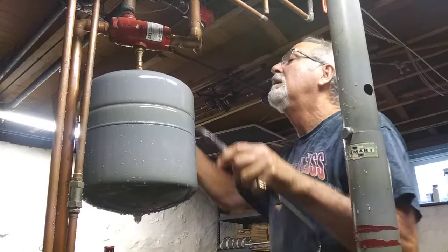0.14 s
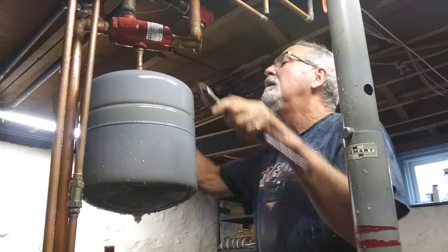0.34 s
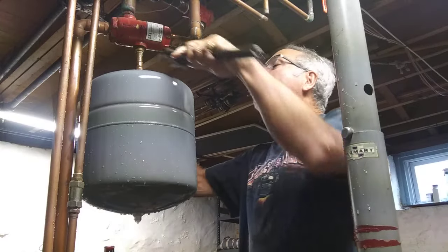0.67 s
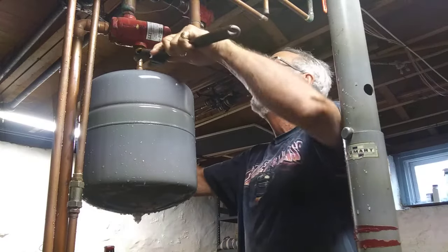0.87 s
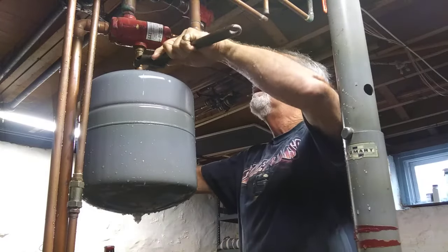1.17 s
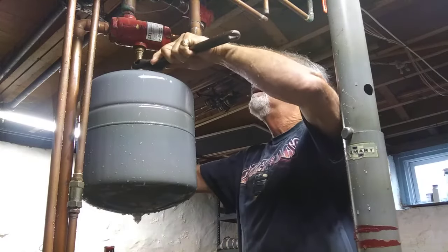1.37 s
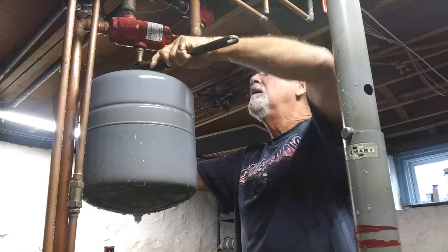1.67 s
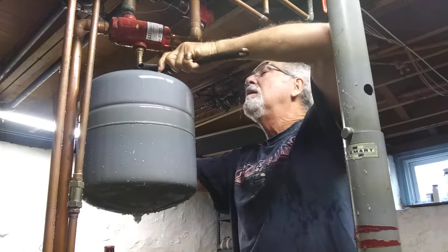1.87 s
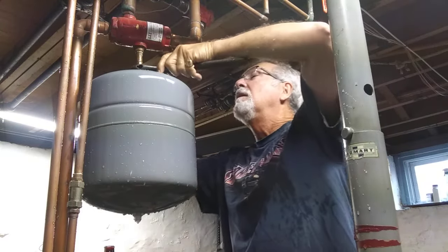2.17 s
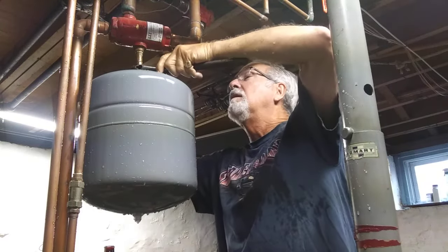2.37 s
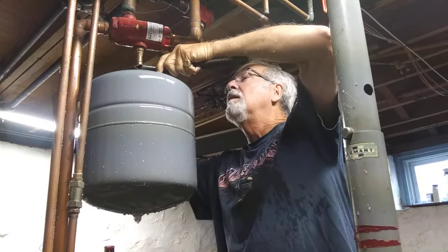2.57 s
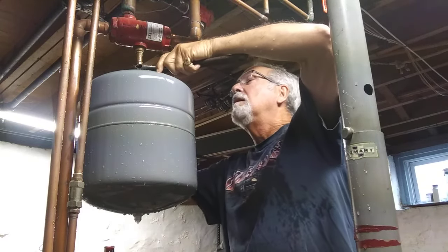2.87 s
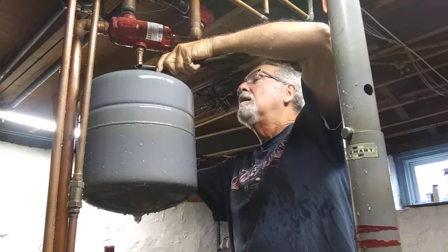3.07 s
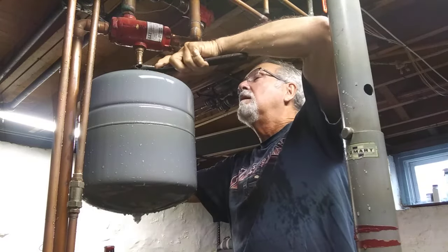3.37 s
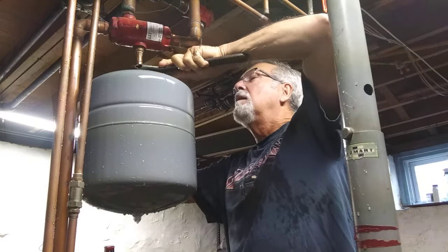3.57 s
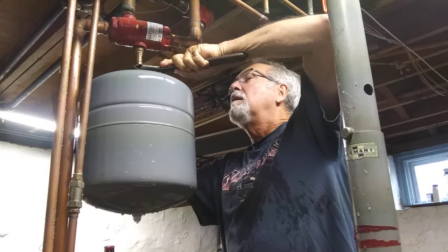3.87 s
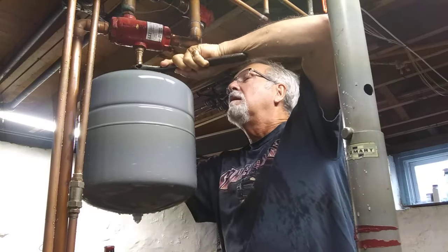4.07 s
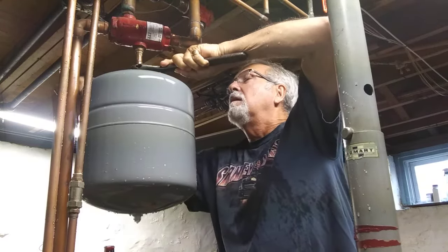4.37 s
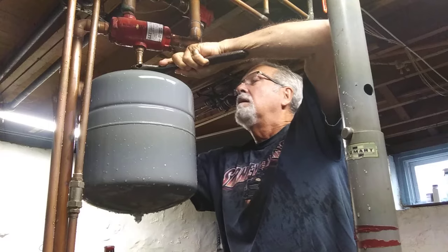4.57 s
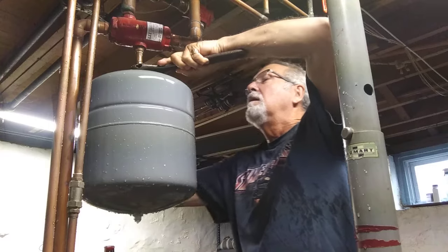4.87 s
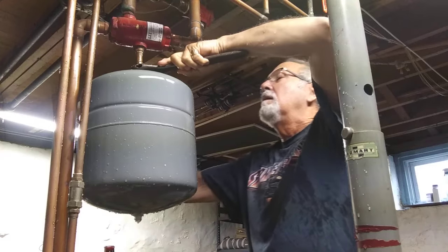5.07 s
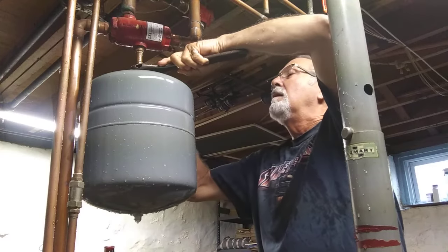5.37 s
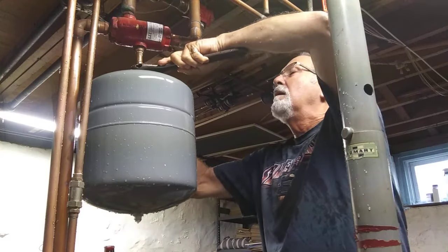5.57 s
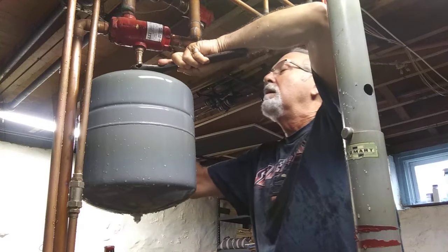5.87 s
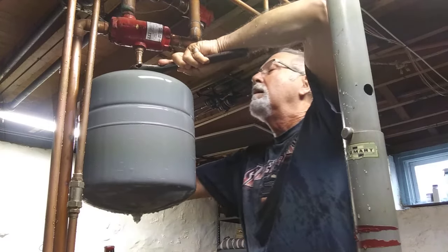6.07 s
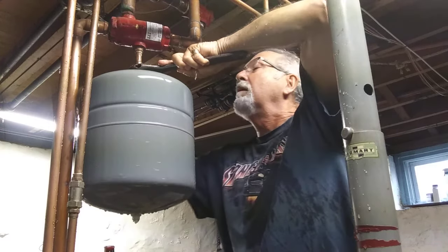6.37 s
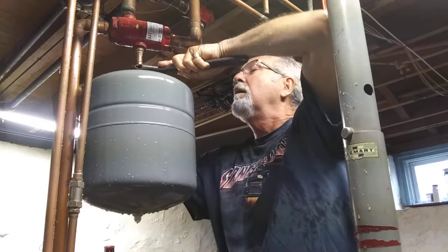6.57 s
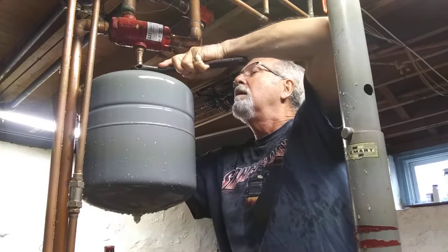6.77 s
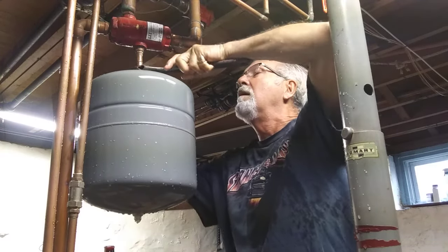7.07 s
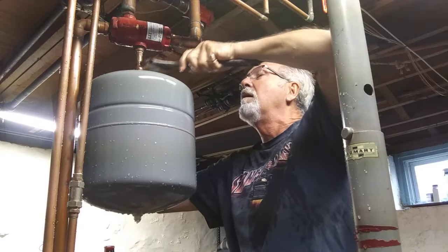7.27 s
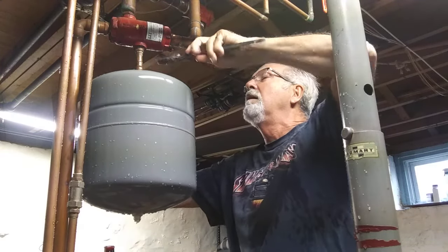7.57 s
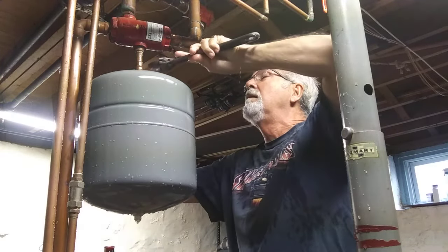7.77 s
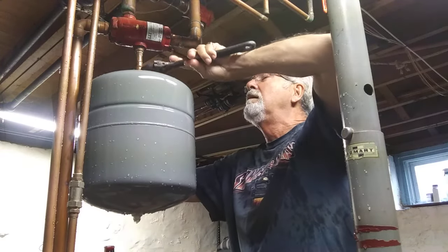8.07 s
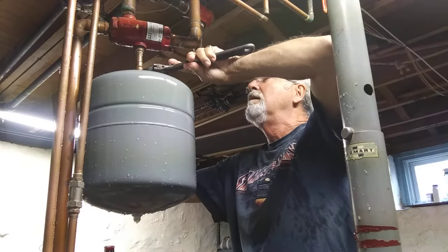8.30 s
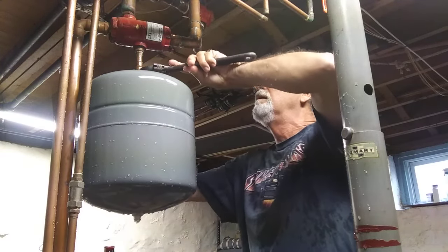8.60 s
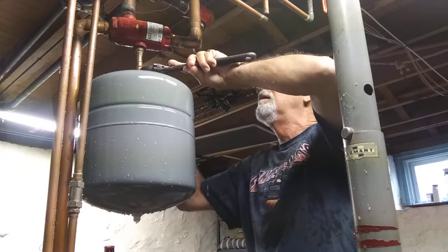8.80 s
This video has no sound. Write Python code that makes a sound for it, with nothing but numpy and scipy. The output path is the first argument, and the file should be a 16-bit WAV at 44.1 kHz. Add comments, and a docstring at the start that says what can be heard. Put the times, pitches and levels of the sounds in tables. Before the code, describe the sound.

Irregular ringing clicks and brief scrapes of a wrench turning a brass fitting, with dull knocks from a steel tank.

```python
"""An adjustable wrench clacks and rings on a threaded brass fitting above a steel expansion tank.
Its loose jaw clacks as it is set and lifted, the handle rings when it bites, and pipe and tank
knock along. Between blows, steel scrapes on brass in showers of tiny slips and gives thin squeaks.
The basement's low ceiling answers with close echoes, over a faint hiss."""
import sys
import numpy as np
from scipy import signal
from scipy.fft import rfft, irfft
from scipy.io import wavfile
from scipy.ndimage import uniform_filter1d

SR = 44100
rng = np.random.default_rng(int(sys.argv[2]) if len(sys.argv) > 2 else 0)


def dump(signal):
    """Clip the signal to [-1, 1] and save it as 16-bit WAV at the path in sys.argv[1]."""
    limited = np.clip(np.atleast_2d(signal).T, -1, 1)
    pcm = np.round(limited * 32767).astype(np.int16)
    wavfile.write(sys.argv[1], SR, pcm)


N = 394254
LENGTH = 32768  # samples set aside for one short sound
T = np.arange(LENGTH) / SR  # its time axis in seconds
HZ = np.fft.rfftfreq(LENGTH, 1 / SR)  # its frequency axis

# Blows of the wrench. Each row: start in seconds, ring level in dB, tank knock level in dB,
# hardness of the contact and brightness of the knock, both as a treble lift in dB per octave.
WRENCH_BLOWS = [ (.495, -34, -47.5, 0, 4.5), (.644, -38.5, -52, 0, 0.5), (0.828, -49, -66, 16, 6),
                (1.222, -30.5, -39.5, -8, 0.5), (1.335, -27.5, -36.5, 1, 1.5),
                (1.569, -58.5, -62.5, 15.5, 15), (1.792, -64.5, -65, -12, -2), (1.998, -56, -46.5, 1, 9.5),
                (2.082, -58, -63, 11, -3), (2.193, -41, -35, -9, -1), (2.602, -67, -54.5, 2, 0),
                (3.047, -42.5, -49, 4.5, -3), (3.177, -43, -45.5, 8.5, 0.5), (4.236, -55.5, -63, 8, -1),
                (4.492, -47.5, -57, 2, -3.5), (4.547, -40.5, -48, 3, -0.5), (4.589, -44.5, -60, 16.5, 5),
                (4.675, -18.5, -39, -2.5, -2), (4.796, -22.5, -28.5, 1.5, 3.5), (5.045, -54.5, -54, -7, -5),
                (5.135, -55, -58, -3, -3), (5.182, -54, -50, 0.5, -3), (5.435, -43.5, -50, 4, -6),
                (5.526, -51, -51, 6, 0.5), (5.794, -69, -58, -11.5, -1), (6.473, -49, -43.5, 2.5, 3),
                (6.603, -61, -57.5, 10, -1), (6.795, -43.5, -52, 1.5, -2), (6.895, -50, -61.5, -0.5, 2),
                (6.933, -52.5, -59, -3.5, 0), (7.104, -53.5, -56, -2, -3), (7.677, -47, -52.5, 9, -1),
                (7.887, -34.5, -35.5, 2.5, 0.5), (7.954, -45, -42.5, -14, -5.5),
                (8.153, -47, -47.5, -4.5, -4), (8.214, -56.5, -54.5, 6.5, -3.5),
                (8.377, -49, -40.5, 2, 0.5), (8.490, -62.5, -50.5, 3, 1), (8.557, -53, -48, 1, -0.5),
                (8.621, -40.5, -52, 2, 4.5), (8.784, -46.5, -46, -11, 2.5), (8.811, -53, -39.5, 14, 0),
                (8.903, -32.5, -31.5, 5.5, -6.5)]
# How firmly the wrench sits. Each row: time in seconds, grip from 0 (loose) to 2 (seated).
WRENCH_GRIP = [(.65, 0.22), (1.22, 1.33), (2, 0.48), (2.19, 1.6), (2.6, 0.49), (3.18, 0.32), (4.24, 0.82),
               (4.67, 0.17), (4.8, 0.63), (6.7, 0.22), (7.68, 0.43), (7.89, 1.19), (8.5, 0.34)]


def wrench_blows():
    """Each blow rings the wrench, knocks the tank and ticks where the metals meet."""
    out = np.zeros(N)
    for start, ring_db, knock_db, hardness, brightness in WRENCH_BLOWS:
        grip = np.interp(start, *np.transpose(WRENCH_GRIP))
        # Heavy blows set the pipework shivering; lighter ones leave less of a tail.
        tail_db = min(FULL_TAIL_DB, 20 + 0.27 * max(ring_db, knock_db))
        hit = basement(tail_db)
        metal = tilted(wrench_ring(hit, grip), hardness, low_hz=1800, high_hz=6400)
        knock = tilted(tank_knock(hit, grip), brightness, low_hz=190, high_hz=2600)
        # The tick grows with the blow and its hardness; a tight grip muffles it.
        tick_db = ring_db - 21.5 + 0.78 * hardness - 2 * grip
        for sound, db in (metal, ring_db), (knock, knock_db), (contact_tick(hit), tick_db):
            add(out, start, at_level(sound, db))
    return out


# The tones of the loose jaw in its slide, the tightly held handle and the brass fitting.
# Each row: pitch in Hz, energy in dB, ring time in seconds (the time to fade by 60 dB).
JAW_TONES = [(2013, 4, 0.025), (2194, 3, 0.014), (2733, -2.5, 0.045), (3580, -5, 0.036),
             (4224, -15.5, 0.018), (4750, -10.5, 0.042)]
HANDLE_TONES = [(2425, -2.5, 0.024), (2563, -1.5, 0.027), (2940, -9.5, 0.035), (3417, -4.5, 0.045),
                (3746, -8, 0.048), (4410, -9.5, 0.034)]
FITTING_TONES = [(2482, -4, 0.034), (3340, 3.5, 0.079), (5150, -22.5, .1)]
# The quickly dying clack of the steel. Each row: frequency in Hz, level in dB.
CLACK_SPECTRUM = [(400, -48), (1400, -7.5), (2100, 4), (3000, 6), (4700, 4), (6000, -4.5), (7500, -17),
                  (16000, -40.5)]


def wrench_ring(drive, grip):
    """As the grip tightens, the ring passes from jaw to handle to fitting and the clack softens."""
    shares = np.maximum(1 - abs(np.clip(grip, 0, 2) - np.arange(3)), 0)
    parts = JAW_TONES, HANDLE_TONES, FITTING_TONES
    tones = sum(share * ring(drive, part) for share, part in zip(shares, parts) if share > 0)
    clack = shaped(drive, CLACK_SPECTRUM)
    return unit(tones) + gain_of(-3 - 4 * grip) * unit(clack)


# The tones of tank and pipework. Each row: pitch in Hz, energy in dB, ring time in seconds.
TANK_TONES = [(188, -14, 0.39), (293.2, -4.5, 0.097), (449.3, -3, 0.22), (633.3, 2.5, 0.085),
              (788, 1, 0.033), (753, -17.5, 1.5), (1074, -9, 0.17)]
# Their quickly dying thud. Each row: frequency in Hz, level in dB.
THUD_SPECTRUM = [(85, -32.5), (130, -12), (200, 7), (400, 7.5), (800, -1), (1300, 0), (2000, -11),
                 (5000, -67.5)]


def tank_knock(drive, grip):
    """A firm grip rings the tank; a loose one mostly thuds."""
    thud = shaped(drive, THUD_SPECTRUM)
    return ring(drive, TANK_TONES) + gain_of(7 - 9 * grip) * unit(thud)


# The bright tick of metal on metal. Each row: frequency in Hz, level in dB.
TICK_SPECTRUM = [(2500, -28.5), (5500, -4.5), (7600, 1.5), (10000, 4.5), (13000, -5.5), (16000, -5)]


def contact_tick(drive):
    """Where the metals meet, each touch gives a short burst of treble."""
    return shaped(drive, TICK_SPECTRUM)


# The tones of the free wrench. Each row: pitch in Hz, energy in dB, ring time in seconds.
FREE_WRENCH_TONES = [(767, 8.5, 0.12), (1710, 6, 0.038), (3270, 7, 0.015), (6300, -6, 0.065)]


def wrench_ping(start_s=0.829, level_db=-48.5):
    """The wrench rings freely in the hand, once."""
    out = np.zeros(N)
    add(out, start_s, at_level(ring(basement(), FREE_WRENCH_TONES), level_db))
    return out


# The high overtones of the steel. Each row: pitch in Hz, energy in dB, ring time in seconds.
STEEL_OVERTONES = [(4420, 5.5, .03), (5230, 2.5, .05), (6266, -1.5, .04), (7200, 0, 0.084),
                   (8820, -4, 0.035)]
# Glancing blows. Each row: start in seconds, level in dB, the pitch it catches best in Hz.
GLANCING_BLOWS = [(1.224, -39, 3900), (1.336, -34, 4100), (4.588, -49, 5700), (4.674, -34, 6380),
                  (4.797, -37, 7350), (7.676, -46.5, 4160)]


def glancing_blows(falloff_db_per_octave=45):
    """A glancing blow rings the overtones near one pitch; the higher that is, the more it cracks."""
    out = np.zeros(N)
    for start, level_db, best_hz in GLANCING_BLOWS:
        hit = basement(tail_db=1)
        tones = [(hz, db - falloff_db_per_octave * abs(np.log2(hz / best_hz)), ring_s)
                 for hz, db, ring_s in STEEL_OVERTONES]
        octaves_away = np.log2(np.maximum(HZ / best_hz, 1 / 4))
        crack = unit(through(hit, click(-13 * octaves_away ** 2)))
        crack_gain = gain_of(1 + 28 * np.log2(best_hz / 6000))
        add(out, start, at_level(ring(hit, tones) + crack_gain * crack, level_db))
    return out


# Strokes of steel sliding on brass. Each row: time of the peak in seconds, rise time in seconds,
# rasp level in dB, tank rumble level in dB.
SCRAPE_STROKES = [ (0.018, 0.054, -58, -83), (.19, 0.035, -62.5, -73), (0.405, 0.029, -39, -50.5),
                  (1.9, 0.2, -68.5, -61.5), (2.209, .012, -47, -41.5), (2.335, .01, -54.5, -52),
                  (2.367, 0.013, -49, -53.5), (2.405, 0.011, -57, -74), (2.451, 0.0082, -55.5, -59),
                  (2.675, 0.041, -59, -64.5), (2.776, 0.022, -48, -56.5), (3.28, 0.068, -60, -79),
                  (3.479, 0.011, -61, -68), (3.94, 0.19, -64.5, -80), (4.264, 0.022, -55.5, -57),
                  (4.525, 0.023, -55.5, -47.5), (5.449, 0.01, -47.5, -49), (6.15, 0.054, -68, -62),
                  (6.84, 0.018, -56, -55.5), (7.14, 0.12, -61, -56), (8.04, 0.08, -58, -51),
                  (8.171, 0.0095, -55.5, -59), (8.812, 0.052, -48, -44.5)]


def scrapes(slips_per_s=1800, spread_db=6, fizz_db=-13):
    """Showers of tiny slips swell and fade with each stroke; under load they make the metal ring."""
    out = np.zeros(N)
    for peak_s, rise_s, rasp_db, rumble_db in SCRAPE_STROKES:
        pressure = np.exp(-2 * (T / rise_s - 2) ** 2) * catching(depth_db=5)
        sizes = gain_of(spread_db * np.minimum(rng.exponential(1, LENGTH), 4))
        signs = rng.choice([-1, 1], LENGTH)
        slipping = rng.random(LENGTH) < slips_per_s / SR
        slips = through(pressure * sizes * signs * slipping, basement())
        load = np.clip(0.5 + (rumble_db - rasp_db) / 6, 0, 2)  # a loaded stroke shakes the tank more
        rasp = unit(shaped(slips, CLACK_SPECTRUM)) + load * wrench_ring(slips, load)
        rumble = tilted(tank_knock(slips, load), db_per_octave=2, low_hz=170, high_hz=2200)
        fizz = contact_tick(slips)
        for sound, db in (rasp, rasp_db), (rumble, rumble_db), (fizz, rasp_db + fizz_db):
            add(out, peak_s - 2 * rise_s, at_level(sound, db))
    return out


def catching(depth_db, step=256):
    """A gain that jumps about every few milliseconds as steel catches and lets go."""
    jumps = rng.standard_normal(LENGTH // step)
    return gain_of(depth_db * np.interp(T, T[::step], jumps))


# Squeaks and groans of the sliding jaw and thread. Each row: time of the peak in seconds,
# half the length in seconds, pitch in Hz, level in dB.
THIN_SQUEAKS = [(1.82, 0.12, 1660, -68), (2.09, .11, 3370, -68.5), (2.17, .05, 4460, -65),
                (4.275, .028, 877, -55), (4.28, .035, 312, -60), (6.15, .06, 900, -71),
                (7.161, .08, 4430, -65), (8.75, .03, 2060, -56)]


def squeaks(ring_s=0.084):
    """Light, uneven friction keeps one tone singing for a moment."""
    out = np.zeros(N)
    for peak_s, half_s, hz, db in THIN_SQUEAKS:
        rub = rng.standard_normal(LENGTH) * np.exp(-(T / half_s - 2) ** 2)
        squeak = resonate(rub, hz, ring_s) * catching(depth_db=4)
        add(out, peak_s - 2 * half_s, at_level(squeak, db))
    return out


def settling_ticks(count=22, loudest_db=-62, range_db=7, soonest_s=0.046, settle_s=0.62):
    """Faint stray ticks as the wrench settles after a blow."""
    out = np.zeros(N)
    for which, wait, softness, grip in rng.random((count, 4)):
        touch = basement(tail_db=1)
        sound = unit(wrench_ring(touch, grip)) + unit(tank_knock(touch, grip))
        blow_s = WRENCH_BLOWS[int(which * len(WRENCH_BLOWS))][0]
        add(out, blow_s + soonest_s + wait * settle_s, at_level(sound, loudest_db - range_db * softness))
    return out


FULL_TAIL_DB = 8  # level of the fullest echo tail
# How long the basement rings. Each row: frequency in Hz, seconds to fade by 60 dB.
ROOM_RING_TIMES = [(150, 0.63), (400, 0.31), (1000, 0.26), (15000, 0.27)]
# Close echoes off the ceiling and the tank. Each row: delay in seconds, gain.
CLOSE_ECHOES = [(.0021, 0.49), (.0055, 0.793), (.0072, 0.83)]


def basement(tail_db=FULL_TAIL_DB, scatter_db=-1, scatter_s=0.011, build_s=0.0029):
    """One tap with its echoes, scatter off the pipes and tail, new for each position of the wrench."""
    hz, t, bands = signal.stft(rng.standard_normal(LENGTH), SR, nperseg=256)
    fade = gain_of(-60 * t / curve_at(ROOM_RING_TIMES, hz)[:, None])
    tail = signal.istft(bands * fade, SR, nperseg=256)[1][:LENGTH]
    tail *= 1 - np.exp(-T / build_s)
    scatter = rng.standard_normal(LENGTH) * np.exp(-T / scatter_s)
    response = gain_of(tail_db) * (unit(tail) + gain_of(scatter_db) * unit(scatter))
    response[0] += 0.86  # the sound that comes straight to the ear
    for delay_s, gain in CLOSE_ECHOES:
        add(response, delay_s * rng.uniform(0.9, 1.1), np.array([gain]))
    return response


# The colour of the background hiss. Each row: frequency in Hz, relative level in dB.
HISS_SPECTRUM = [(30, -53), (140, -18.5), (230, -6), (420, -3.5), (480, -7), (728, -5.5), (852, -10),
                 (1640, -11.5), (4310, -17), (5890, -28), (15500, -22)]


def hiss(level_db=-65):
    """Still room air and steady microphone hiss."""
    colour = gain_of(curve_at(HISS_SPECTRUM, np.fft.rfftfreq(N, 1 / SR)))
    air = irfft(rfft(rng.standard_normal(N)) * colour, N)
    return unit(air) * np.sqrt(N) * gain_of(level_db)


def ring(drive, tones, detune=0.0084):
    """A metal part's tones, shifted slightly by the hold; neighbours swing in opposite directions."""
    shifts = 1 + detune * rng.uniform(-1.4, 1, len(tones))
    return unit(sum((-1) ** k * gain_of(db) * resonate(drive, hz * shifts[k], ring_s)
                    for k, (hz, db, ring_s) in enumerate(tones)))


def resonate(drive, hz, ring_s):
    """One tone shaken by the drive (a tap or a rub), fading by 60 dB in ring_s seconds."""
    radius = np.exp(-np.log(1000) / (ring_s * SR))
    feedback = [1, -2 * radius * np.cos(2 * np.pi * hz / SR), radius ** 2]
    return unit(signal.lfilter([1, 0, -1], feedback, drive))


def tilted(x, db_per_octave, low_hz, high_hz):
    """Leans the sound between two frequencies: brighter for a hard contact, duller for a soft one."""
    slope = db_per_octave * np.log2(np.clip(HZ, low_hz, high_hz))
    return through(x, click(slope)[:LENGTH // 16])


def shaped(x, spectrum):
    """Colours a sound with a table of frequencies and levels."""
    return through(x, click(curve_at(spectrum, HZ)))


def click(db):
    """The shortest pulse that starts at once and has this spectrum."""
    log_gain = np.log(gain_of(np.r_[db, db[-2:0:-1]]))
    spectrum = np.exp(np.conj(signal.hilbert(log_gain)))
    return unit(np.fft.ifft(spectrum).real)


def through(x, response):
    """Passes a sound through a response (convolution), keeping its length."""
    return signal.fftconvolve(x, response)[:len(x)]


def curve_at(points, hz):
    """Joins rows of frequency and value with straight lines on an octave scale."""
    frequencies, values = np.transpose(points)
    return np.interp(np.log(hz + 1), np.log(frequencies), values)


def at_level(x, db, window=1024):
    """Sets the average (rms) level of the loudest short stretch."""
    peak_power = uniform_filter1d(x ** 2, window, mode="constant").max()
    return x * gain_of(db) / np.sqrt(peak_power + 1e-20)


def add(mix, start_s, sound):
    """Lays a sound into the mix, dropping whatever falls outside."""
    start = round(start_s * SR)
    sound = sound[max(-start, 0):]
    part = mix[max(start, 0):][:len(sound)]
    part += sound[:len(part)]


def gain_of(db):
    """Turns decibels into a gain."""
    return 10 ** (np.asarray(db) / 20)


def unit(x):
    """Scales a sound to an energy of one."""
    return x / np.sqrt(np.sum(x ** 2) + 1e-20)


def scene(low_cut_hz=120):
    """The wrench at work in the quiet basement; small metal parts give off little bass."""
    work = wrench_blows() + wrench_ping() + scrapes() + glancing_blows() + squeaks() + settling_ticks()
    low_cut = signal.butter(2, low_cut_hz, "high", fs=SR, output="sos")
    return (signal.sosfilt(low_cut, work) + hiss())[None]


def record(dry, top_hz=15900):
    """Cuts off the very highest treble."""
    high_cut = signal.firwin(511, top_hz, window=("kaiser", 9), fs=SR)
    return signal.oaconvolve(dry, high_cut[None], "same")


dry = scene()
out = record(dry)
dump(out)
```